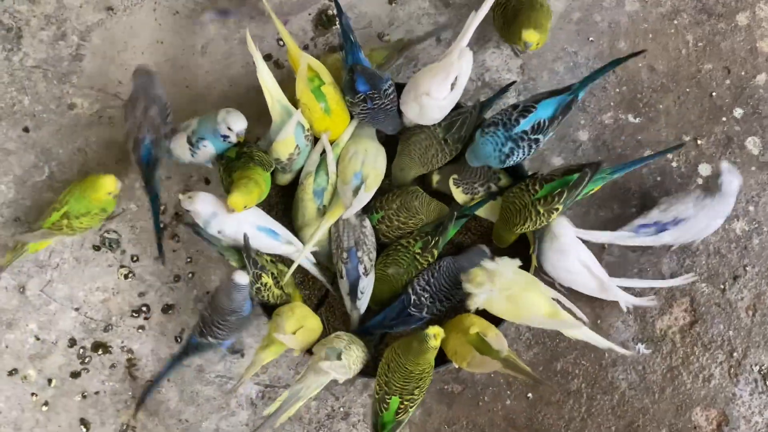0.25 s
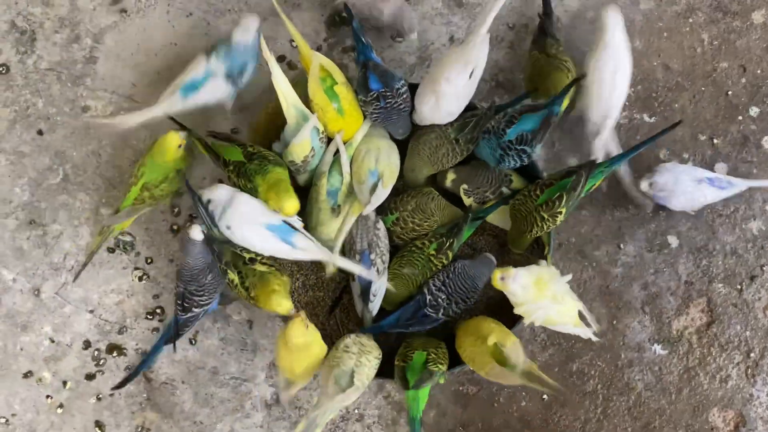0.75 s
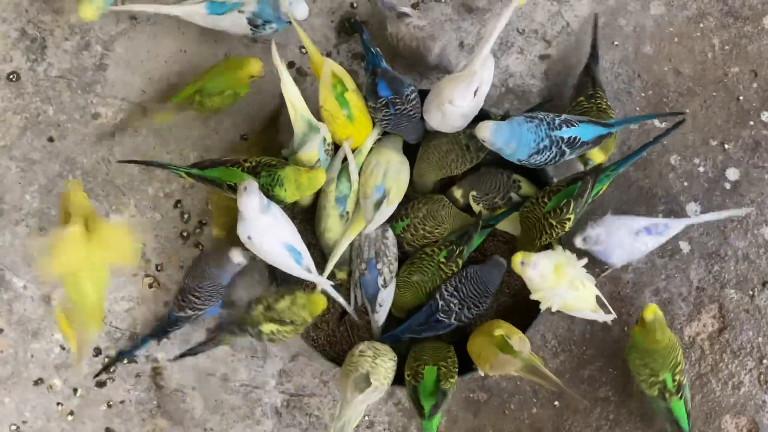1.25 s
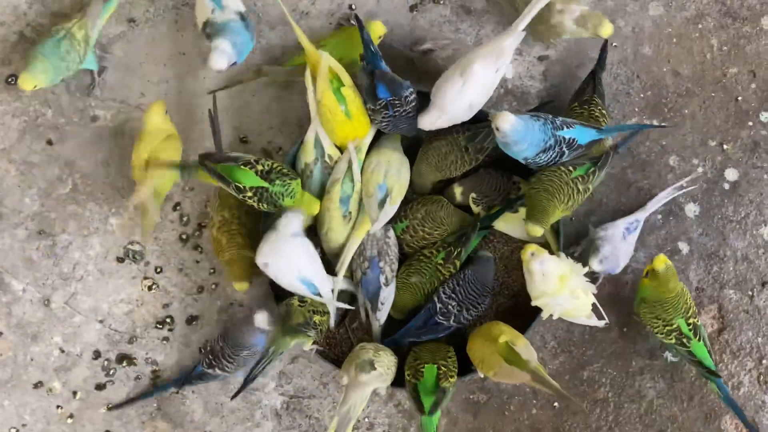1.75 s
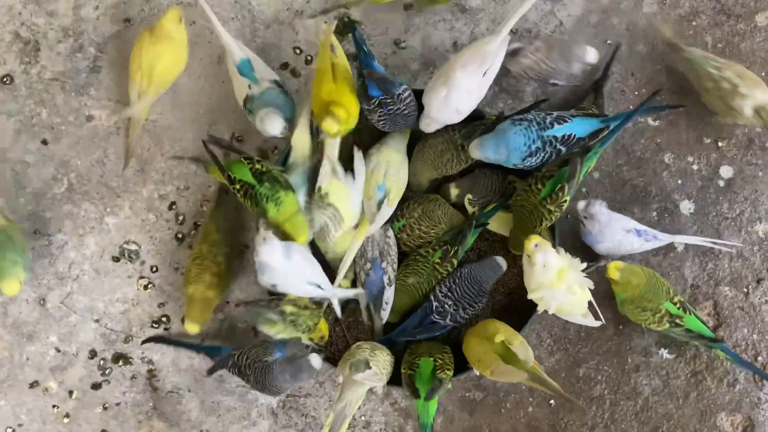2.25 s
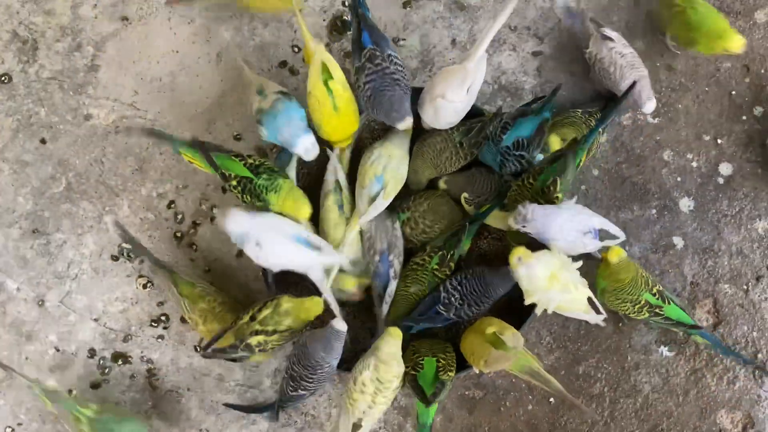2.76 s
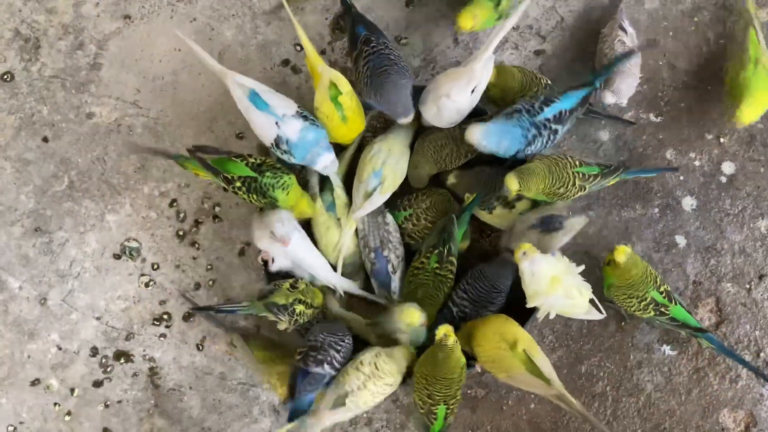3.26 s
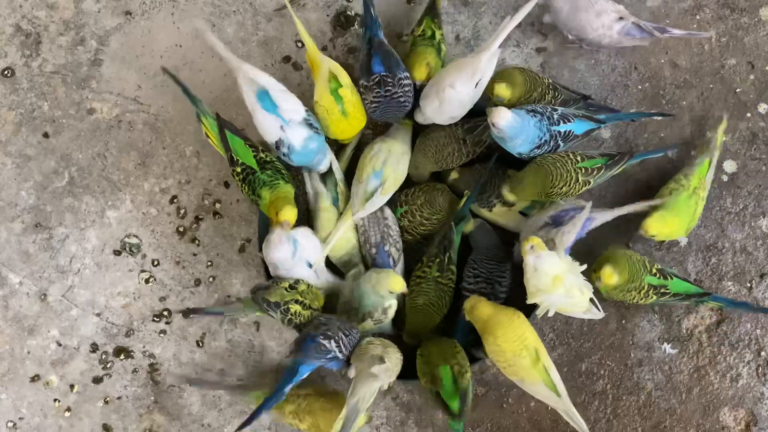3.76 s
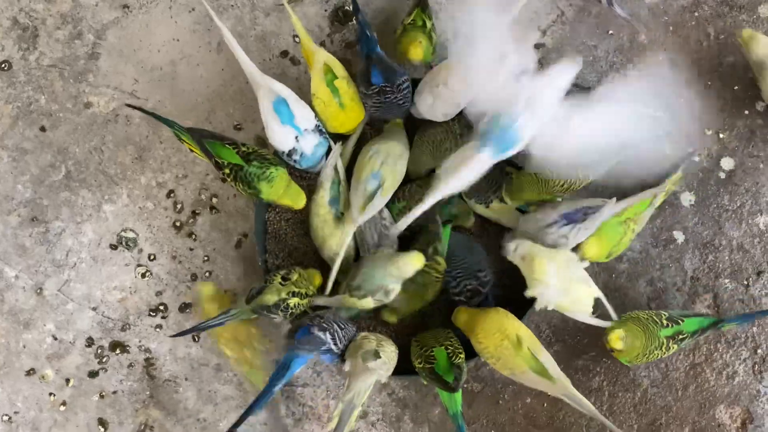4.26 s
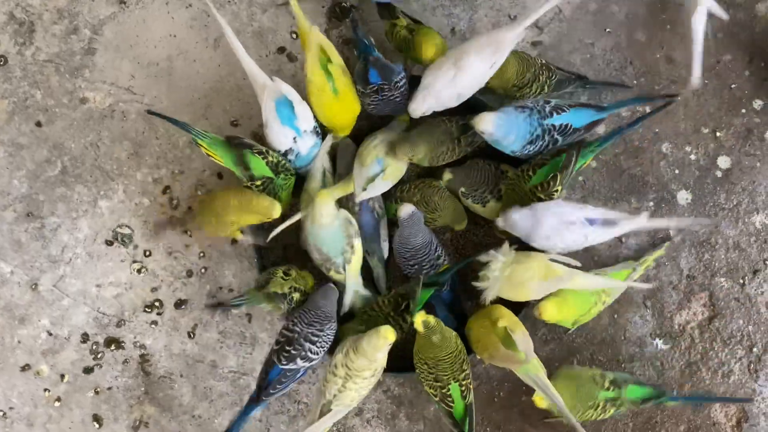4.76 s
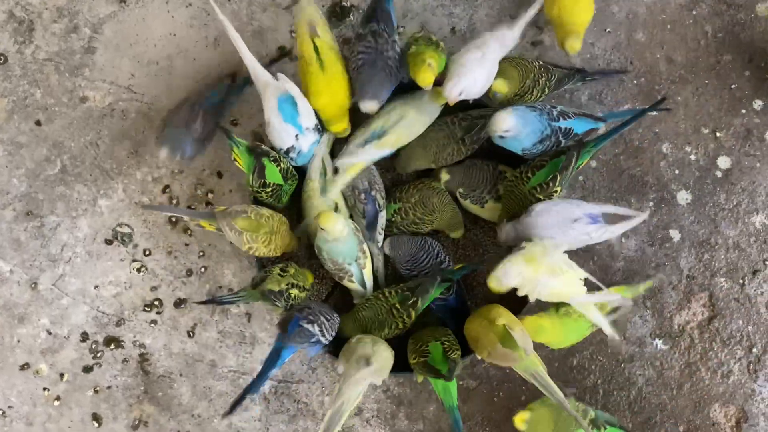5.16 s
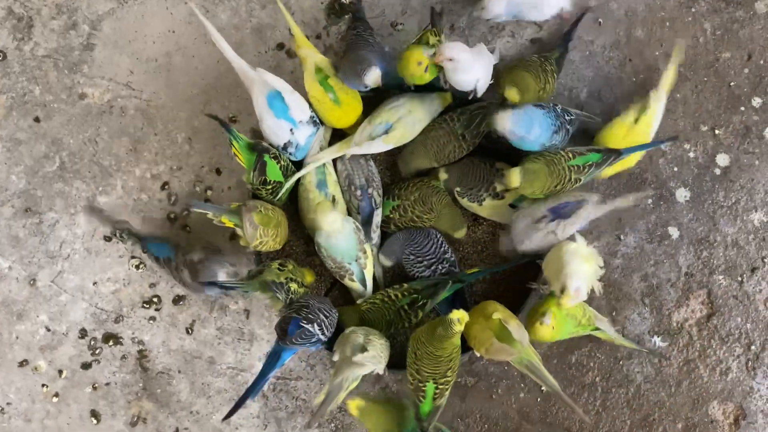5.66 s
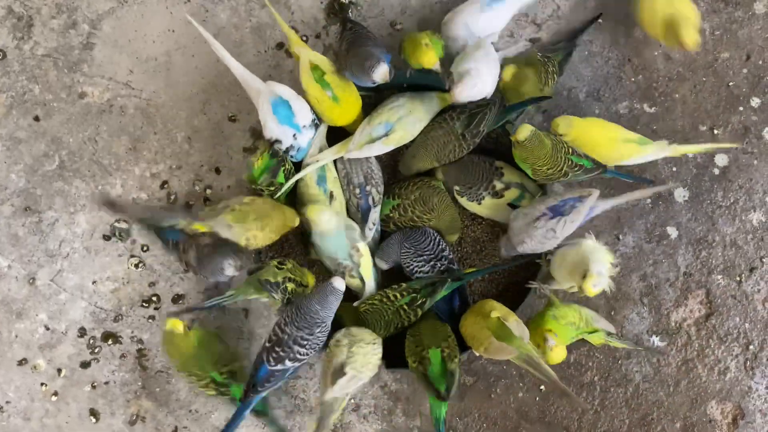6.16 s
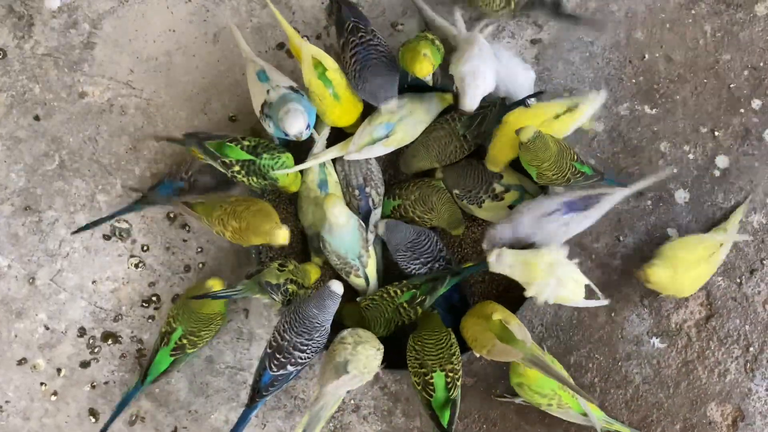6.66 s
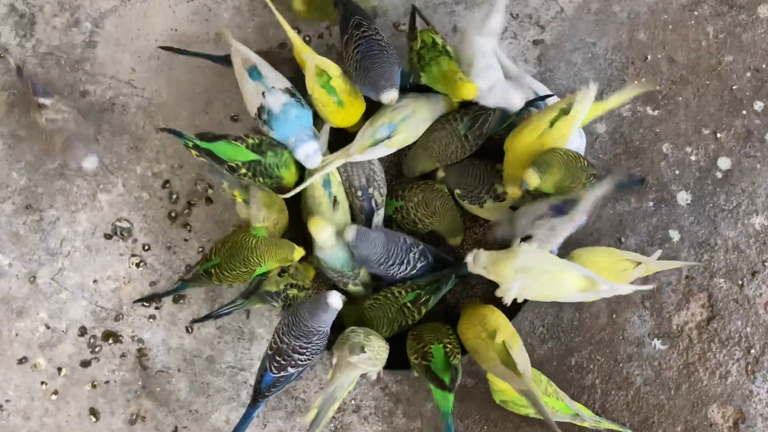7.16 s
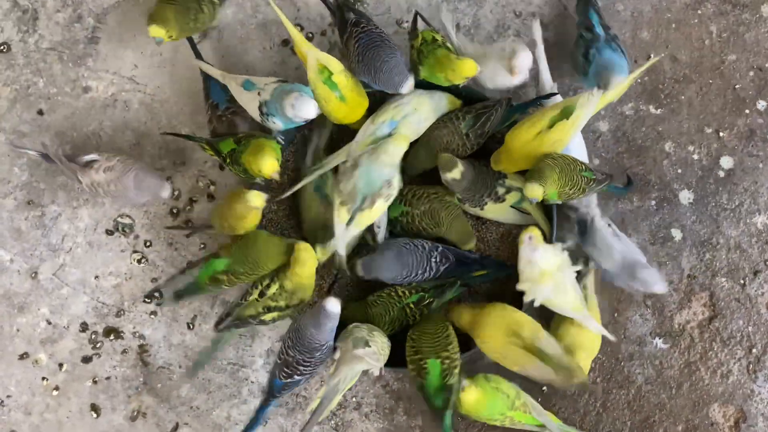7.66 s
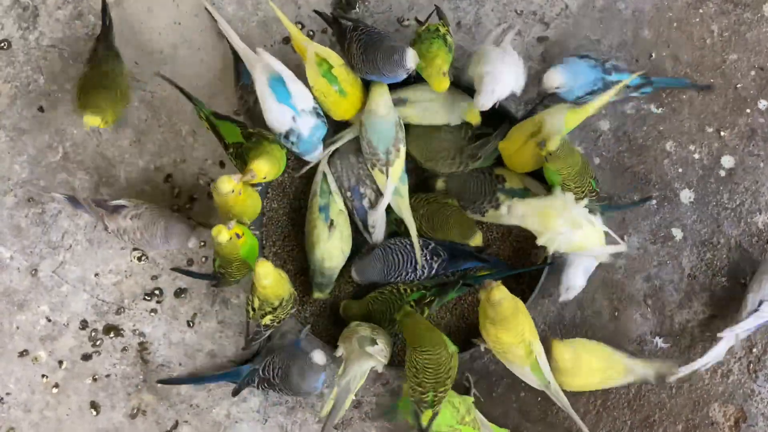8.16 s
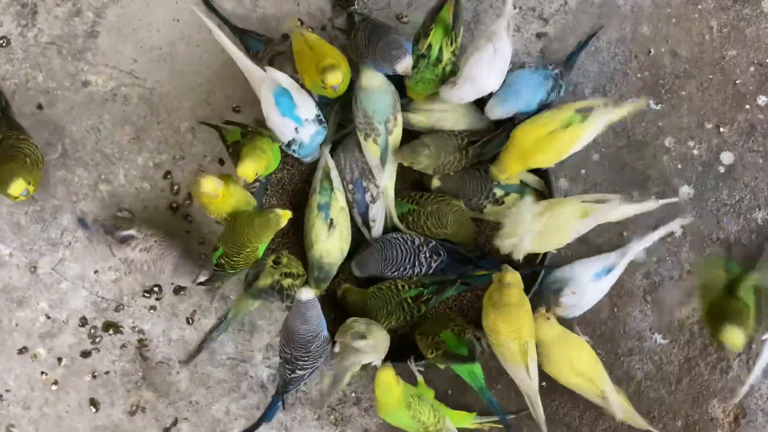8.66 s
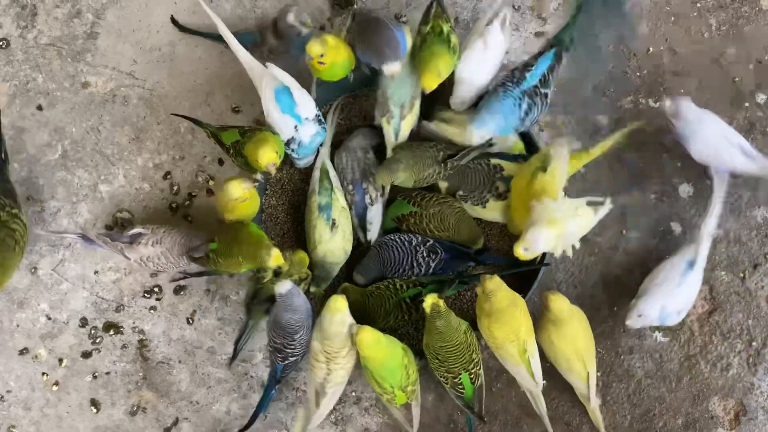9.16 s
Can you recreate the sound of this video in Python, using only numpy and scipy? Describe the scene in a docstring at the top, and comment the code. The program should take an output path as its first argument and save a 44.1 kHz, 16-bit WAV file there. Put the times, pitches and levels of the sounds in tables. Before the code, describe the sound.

Close view of budgerigars squabbling round a food bowl in a hard-walled aviary. Quick runs of rough, high chirps alternate with lone calls, raspy drawn-out squawks and short clear whistles. Soft wing flutters puff now and then. Pauses open between runs, and the densest chatter comes in the second half. A faint low rumble and swelling hum lie underneath. Close stereo microphones, short room tail.

```python
"""Rough chirps tumble over each other as budgerigars squabble round a bowl on an aviary's concrete floor.
Clear whistles and one nasal note join in, wings flutter now and then, and a rumble and a drone lie below.
Voices are stacks of sliding partials broken up by noise; wings, rumble and drone are filtered noise.
The walls add a short tail, and two close microphone ports hear it all with a phase twist in the treble."""
import sys
import numpy as np
from scipy import signal
from scipy.fft import rfft, irfft, next_fast_len
from scipy.io import wavfile

SR = 44100
rng = np.random.default_rng(int(sys.argv[2]) if len(sys.argv) > 2 else 0)


def store_wav(level_fs):
    """Save 16-bit WAV to argv[1]."""
    pcm = np.round(np.clip(np.atleast_2d(level_fs), -1, 1) * 32767)
    wavfile.write(sys.argv[1], SR, pcm.T.astype(np.int16))


N = 415422   # length of the scene in samples


def from_db(db):
    """Turn decibels into a gain."""
    return 10 ** (np.asarray(db) / 20)


def rms_one(x):
    """Scale a sound so that its rms is 1."""
    return x / np.sqrt(np.mean(x ** 2) + 1e-20)


def band(x, low_hz, high_hz):
    """Keep what lies between two frequencies (Butterworth band-pass)."""
    return signal.sosfilt(signal.butter(2, [low_hz, high_hz], "band", fs=SR, output="sos"), x)


def wander(rate_hz):
    """Random drift with rms 1: noise smoothed twice by a one-pole low-pass."""
    r = np.exp(-2 * np.pi * rate_hz / SR)
    noise = rng.standard_normal(N + SR)
    smooth = signal.lfilter([1], [1, -2 * r, r * r], noise)
    return rms_one(smooth[SR:])   # the first second lets the filter settle


def by_hz(x, gain):
    """Filter by a gain given as a function of frequency in Hz."""
    size = next_fast_len(N + SR)
    hz = np.arange(size // 2 + 1) * SR / size
    return irfft(rfft(x, size) * gain(np.maximum(hz, 1)), size)[..., :N]


def drone():
    """A narrow low band of noise swells and fades."""
    # loudness of the drone over time: t/s, level/dB
    drone_levels = [(1.6, -59), (2.0, -42), (3.1, -57.5), (6.4, -58.5), (6.7, -50.5), (9.4, -45.5)]
    level_db = np.interp(np.arange(N) / SR, *np.transpose(drone_levels))
    return from_db(level_db) * rms_one(band(rng.standard_normal(N), 108.8, 134.4))


def rumble(level_db, side_db=-15.0, side_tilt_db=2.0):
    """Far noise, most alike at both ports in the bass, where the shed booms."""
    # relative spectrum of the noise: f/Hz, level/dB
    spectrum = [(25, -11), (82, 2), (796, -21.5), (2840, -31), (6380, -35), (16000, -44.5)]
    hz, db = np.transpose(spectrum)
    noise = rng.standard_normal((2, N))
    mid, side = by_hz(noise, lambda f: from_db(np.interp(np.log(f), np.log(hz), db)))
    # the difference between the ports grows by side_tilt_db per octave
    side = by_hz(side, lambda f: from_db(np.minimum(side_db + side_tilt_db * np.log2(f / 60), -3.0)))
    mid = mid + 0.95 * band(mid, 50.5, 106.6)
    return from_db(level_db) * (mid + side * [[1], [-1]]) / np.std(mid)


def stir_db(rest_db=-69.0):
    """Wing level in dB: each burst rises out of a faint constant shuffle and dies away."""
    # bursts of wing beats: t/s, length/ms, level/dB
    bursts = [(1.031, 170, -56), (1.38, 205, -49), (1.796, 640, -46), (2.399, 650, -54.5), (3.93, 256, -49),
              (5.94, 410, -56), (6.477, 655, -44), (7.2, 1260, -52), (8.478, 695, -45.5), (9.198, 330, -48)]
    power = np.full(N, from_db(2 * rest_db))   # twice the dB gives power
    for s, ms, db in bursts:
        at = np.arange(round(s * SR), min(round((s + ms / 1000) * SR), N))
        power[at] += from_db(2 * db) * signal.windows.tukey(len(at), .5)
    return 10 * np.log10(power)


def wings(level_db, beats_per_s=24.0):
    """Each uneven stroke pushes a short puff of air; strokes come in clumps and feathers rustle above."""
    stroke = np.cumsum(beats_per_s * (1 + 0.406 * wander(5.04))) / SR   # strokes so far
    clumps = from_db(5.0 * wander(7.0))
    puff = np.cos(np.pi * stroke) ** 4 * clumps + .4
    shared, differing = rng.standard_normal((2, N))
    air = shared + 0.13 * differing * [[1], [-1]]
    feathers = band(air, 365.0, 545.0) + from_db(-15.0) * band(air, 754.0, 1440.0)
    return from_db(level_db) * rms_one(puff * feathers)


def whistles(rows, partials_db):
    """Steady glides of a few clean partials with soft ends."""
    out, unsteady = np.zeros(N), wander(126.0)
    for s, ms, first_hz, last_hz, db in rows:
        size = round(ms * SR / 1000)
        at = round(s * SR) + np.arange(size)
        pitch = np.linspace(first_hz, last_hz, size) * (1 + 0.02 * unsteady[at])
        phase = 2 * np.pi * np.cumsum(pitch) / SR
        tone = sum(from_db(part_db) * np.sin(order * phase)
                   for order, part_db in enumerate(partials_db, 1))
        out[at] += from_db(db) * signal.windows.tukey(size, .4) * tone
    return out


def calls():
    """List every chirp and squawk: t/s, basic length/ms, f/Hz, level/dB, octave level/dB, scoop."""
    # short chirps: t/s, f/Hz, level of the fundamental/dB
    chirp_rows = [(0.056, 3720, -37), (0.128, 3370, -45.5), (0.182, 3330, -36.5), (0.335, 3000, -39.5),
                  (0.368, 3686, -37.5), (0.49, 3290, -33.5), (0.562, 3510, -35), (0.619, 3330, -38),
                  (0.681, 3230, -36.5), (0.751, 3145, -35.5), (0.817, 3026, -41.5), (0.875, 3330, -50),
                  (1.159, 2690, -46), (1.284, 2540, -51), (1.498, 2870, -44), (1.572, 3330, -44.5),
                  (1.618, 2854, -41.5), (1.819, 3185, -39), (1.884, 3390, -39), (1.961, 3124, -37),
                  (2.027, 3200, -36.5), (2.096, 3310, -39), (2.169, 3020, -37), (2.239, 3280, -35),
                  (2.322, 3113, -38), (2.486, 3080, -34.5), (3.237, 3370, -33), (3.364, 2974, -30.5),
                  (3.504, 3236, -38), (3.654, 3210, -40), (3.737, 3030, -35), (3.815, 2710, -37.5),
                  (5.088, 3584, -42), (5.246, 3300, -36.5), (5.38, 3396, -32.5), (5.462, 3436, -32.5),
                  (5.51, 3270, -33.5), (5.537, 3400, -32.5), (5.6, 3130, -35.5), (5.634, 3276, -34.5),
                  (5.684, 3050, -37.5), (5.704, 3370, -34.5), (5.774, 3250, -30), (5.902, 3280, -36),
                  (5.961, 3080, -33), (6.046, 3117, -33.5), (6.123, 3350, -34.5), (6.179, 3100, -39.5),
                  (6.203, 3195, -37.5), (6.276, 3146, -37), (6.377, 3180, -41), (6.451, 3240, -42),
                  (6.974, 3280, -41.5), (7.002, 3025, -43.5), (7.102, 3070, -46), (7.171, 3100, -41.5),
                  (7.192, 3010, -39.5), (7.246, 3246, -36), (7.282, 3355, -40.5), (7.317, 3160, -42.5),
                  (7.376, 3176, -39), (7.459, 3400, -43), (7.491, 3110, -35.5), (7.521, 3350, -38),
                  (7.589, 3260, -33), (7.635, 3200, -31.5), (7.661, 3770, -30.5), (7.691, 3700, -30),
                  (7.718, 3690, -36.5), (7.771, 3770, -37), (7.83, 3890, -36), (7.856, 2950, -34.5),
                  (7.877, 3680, -34.5), (7.938, 2940, -32), (8.006, 3023, -29.5), (8.071, 3256, -37),
                  (8.138, 2630, -41.5), (8.231, 2360, -58), (8.395, 2620, -30.5), (8.424, 3063, -31.5),
                  (8.642, 2560, -35.5), (8.701, 2510, -42.5), (8.775, 3035, -36), (8.855, 2340, -40.5),
                  (9.046, 3450, -32), (9.096, 2270, -39.5), (9.182, 2964, -41), (9.251, 3240, -39.5),
                  (9.277, 2860, -43), (9.354, 2815, -42)]
    # chirps that start high and fall: t/s, f/Hz, level of the fundamental/dB
    falling_rows = [(2.405, 2817, -34.5), (4.513, 2940, -41), (6.705, 2920, -41), (6.774, 2860, -47.5),
                    (6.883, 2834, -38), (8.979, 2990, -36), (9.132, 2070, -38)]
    # drawn-out squawks: t/s, basic length/ms, f/Hz, level of the fundamental/dB
    squawk_rows = [(0.954, 84, 3364, -52.5), (1.682, 112, 3060, -43), (2.562, 113, 3673, -34.5),
                   (2.694, 108, 3393, -40), (2.818, 70, 3366, -41.5), (2.921, 117, 3243, -45.5),
                   (3.078, 96, 3177, -39), (3.917, 69, 3010, -37), (5.148, 107, 3223, -38),
                   (5.305, 61, 3450, -33), (7.048, 55.5, 3457, -38), (8.486, 133, 2964, -34)]
    # lone chirps of birds further off that cut across the runs: t/s, f/Hz, level of the fundamental/dB
    answer_rows = [(0.216, 2340, -46.5), (0.299, 3290, -36.5), (0.316, 2500, -38), (0.422, 3495, -43.5),
                   (0.684, 2390, -43.5), (0.897, 3350, -44), (0.956, 2930, -40.5), (2.298, 2620, -51.5),
                   (4.293, 2350, -51), (4.913, 3090, -50), (5.394, 2760, -44), (5.443, 2300, -44),
                   (6.065, 2190, -40), (6.62, 2730, -49), (6.828, 2970, -49), (6.908, 3370, -46),
                   (7.222, 2506, -46), (8.08, 2540, -44), (8.323, 2820, -45.5), (8.352, 2460, -45)]
    # harshness of the squabble: t/s, level of the octave over the fundamental/dB
    harshness = [(0.1, -13), (0.5, 1.5), (1.6, -2), (2.2, 1.5), (3.1, 10.5), (3.24, -9.5), (3.5, 4),
                 (3.95, 9.5), (5.1, -0.5), (5.75, -10.5), (6.3, -3), (7.2, 3), (7.9, -4), (9.0, -7),
                 (9.2, 2)]
    far_dull_db = -9         # distance takes this much off the octave of an answer
    rise, fall = 0.42, -0.3  # basic share of the pitch by which a call starts low (or high)
    run_gap_ms = 92          # calls closer than this belong to one run
    run_fill, lone_ms = 0.6, 34.5   # basic length: share of the gap in a run, fixed for a lone chirp

    starts = np.sort([row[0] for row in chirp_rows + falling_rows + squawk_rows] + [np.inf])
    rows = [(*row, rise, 0) for row in squawk_rows]
    near = [(*row, rise) for row in chirp_rows] + [(*row, fall) for row in falling_rows]
    for s, hz, db, scoop in near:
        gap_ms = 1000 * (starts[starts > s][0] - s)
        ms = run_fill * gap_ms if gap_ms < run_gap_ms else lone_ms
        rows.append((s, ms, hz, db, scoop, 0))
    rows += [(s, lone_ms, hz, db, rise, far_dull_db) for s, hz, db in answer_rows]
    return [(s, ms, hz, db, np.interp(s, *np.transpose(harshness)) + dull_db, scoop)
            for s, ms, hz, db, scoop, dull_db in rows]


def chirps(waver=0.02, droop=1.7, step_db=-5.5, half_db=-18.0, breath_db=-2.5):
    """The syrinx starts off pitch, slides to pitch and sags; bright or long calls are pressed and rough."""
    out, unsteady = np.zeros(N), wander(76.3)
    shaky = wander(400.0) + 1j * wander(390.0)
    # each partial breaks up on its own: it reads the same noise at another time
    flutter = [np.roll(shaky, order * SR // 2) for order in range(13)]
    breath = rms_one(band(rng.standard_normal(N), 2900.0, 7500.0))
    rasp = wander(170.0)   # the air flow stutters in a rough call
    rows = calls()
    tempers = rng.uniform(-1.0, 1, len(rows))   # calls differ in slide and hoarseness
    for (s, ms, hz, db, octave_db, scoop), temper in zip(rows, tempers):
        t = np.arange(round(1.097 * ms * SR / 1000))   # a call sounds a little over its basic length
        at, part, t_ms = round(s * SR) + t, t / len(t), t * 1000 / SR
        push_db = 0.011 * (db + octave_db + 26.5)   # loud calls gain treble faster than body
        rough = np.clip(0.3895 + 0.016 * octave_db + 0.005 * (ms - 45) + 0.12 * temper, .05, .7)

        settle_ms = 5.0 if scoop > 0 else 12.0
        slide = scoop * (1.2 - rough) * (1 - temper / 2) * np.exp(-t_ms / settle_ms)
        arch = 0.2 * rough * (1 - part / 0.45) ** 2   # below pitch away from 45 % of the call
        sag = droop * min(rough, .45) * (1 + temper / 2) * np.maximum(part - .65, 0)
        pitch = hz * (1 - slide - arch - sag)
        phase = np.pi * np.cumsum(pitch * (1 + waver * unsteady[at])) / SR   # of half the pitch

        onset = np.exp(-t_ms / 6.9)
        grip = 1 - 0.55 * (scoop > 0) * onset   # the tone is weak while it slides up
        scratch = rough + 0.9 * onset           # air rushes before the voice takes hold
        voice = from_db(breath_db) * scratch * (1 + from_db(octave_db)) / 2 * breath[at]
        for order, noise in enumerate(flutter, 1):   # order 2 is the fundamental, 4 its octave
            treble_db = push_db + step_db * (1.93 - rough / 2) * abs(order / 2 - 2) ** 1.02
            gain = from_db((order > 2) * octave_db + (order > 4) * treble_db)
            if order % 2:   # pressed membranes skip every other beat: lines halfway between the partials
                gain = gain * rough * from_db(half_db * (1.0 + 2 * (order == 1)))
            steady_and_broken = np.sqrt(2 - 2 * rough) + np.sqrt(rough) * noise[at]
            voice += grip * gain * np.real(steady_and_broken * np.exp(1j * order * phase))

        # a sharp start, a swell to about a third of the call (long calls hold it), then a fade
        attack = 1 - np.exp(-t_ms / 0.73)
        swell = 0.32 + np.sin(np.pi * part ** 0.63) ** min(2, 203.0 / ms)
        effort = attack * swell * np.cos(np.pi / 2 * part ** 3.24)
        out[at] += from_db(db + 5.2 * rough * rasp[at]) * effort * voice
    # windpipe and beak favour a resonance and its octave, so each slide lights up as it arrives there
    return 1.298 * out + 0.5 * band(out, 3040.0, 3860.0) + 0.53 * band(out, 5120.0, 6630.0)


def aviary(x, t60_s=0.15, side_db=-19.5):
    """Hard walls give a dense tail, fading 60 dB in t60_s and mostly alike at both ports."""
    t = np.arange(round(.4 * SR)) / SR
    tail = rng.standard_normal((2, len(t))) * from_db(-60 * t / t60_s) * (t > .003)
    tail = band(tail, 800.0, 13400.0)
    mid, side = signal.fftconvolve(x[None], tail / np.linalg.norm(tail[0]), axes=1)[:, :N]
    return mid + from_db(side_db) * side * [[1], [-1]]


def scene():
    """Birds in their room over wings, rumble and drone; the rumble swells as the flock stirs."""
    # clear whistles: t/s, length/ms, first f/Hz, last f/Hz, level before the partials' own/dB
    whistle_rows = [(0.254, 16, 3280, 2900, -37), (0.267, 37, 2880, 4120, -38.5),
                    (0.282, 10, 2230, 1780, -36.5), (1.379, 21.3, 3490, 3260, -26.5),
                    (1.408, 10, 2920, 2420, -27), (1.457, 16, 2490, 3420, -30),
                    (1.421, 36, 2754, 3010, -24.5), (1.49, 21.5, 3183, 3054, -23.5),
                    (2.456, 36, 3680, 3970, -32.5), (2.536, 38, 2837, 3056, -28),
                    (3.22, 17, 4350, 4040, -38.5), (3.262, 46, 3380, 2470, -34), (3.3, 42, 3050, 3470, -32),
                    (3.343, 19, 1770, 1920, -38), (5.505, 35, 1800, 1745, -48),
                    (5.999, 59, 2016, 3240, -31.5), (7.97, 33, 4100, 3190, -28),
                    (7.992, 39, 2700, 2910, -31), (9.021, 34, 2650, 3240, -34.5)]
    # a low nasal note with bright stacked partials: columns as for the whistles
    nasal_rows = [(3.87, 38, 1400, 1407, -24)]
    wing_db = stir_db()
    birds = chirps()
    birds = birds + whistles(whistle_rows, (4.0, -18.0))
    birds = birds + whistles(nasal_rows, (-26.5, -16.0, -4.5, 3.0))
    floor = rumble(-45.5 + 0.22 * (wing_db - wing_db.mean())) + drone()
    return birds + from_db(-9.5) * aviary(birds) + wings(wing_db) + floor


def record(dry):
    """The ports share the phase twist between them and lift the top treble; above that it is cut."""
    # phase by which the left port leads the right: f/Hz, phase/rad
    port_twist = [(4500, -.2), (5500, -1.1), (6200, -6.3), (8300, -8.8), (10400, -6.9), (12000, -6.3)]
    cutoff_hz = 16500   # from here up all is at least 70 dB down
    hz, radians = np.transpose(port_twist)

    def port_gain(f):
        lift = from_db(10.0 / (1 + ((f - 15400.0) / 650.0) ** 2))
        return lift * np.exp(1j * np.interp(f, hz, radians / 2) * [[1], [-1]])

    ports = by_hz(dry, port_gain)
    return signal.sosfilt(signal.cheby2(20, 70, cutoff_hz, fs=SR, output="sos"), ports)


dry = scene()
out = record(dry)
store_wav(out)
```